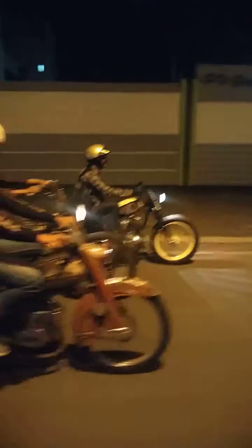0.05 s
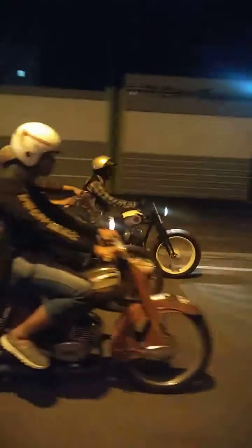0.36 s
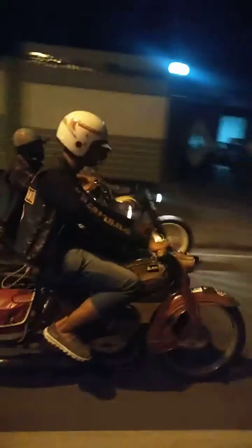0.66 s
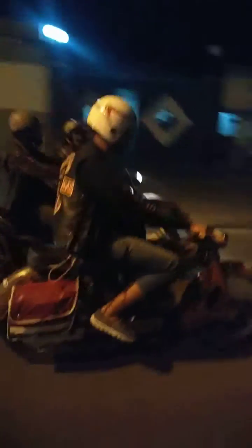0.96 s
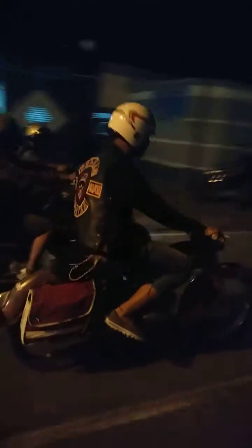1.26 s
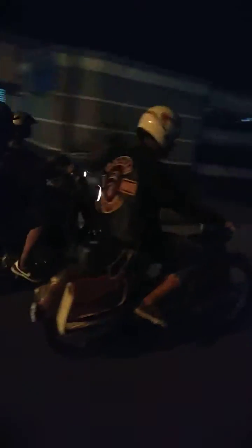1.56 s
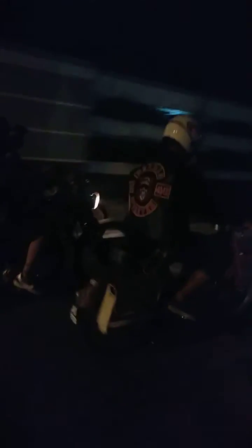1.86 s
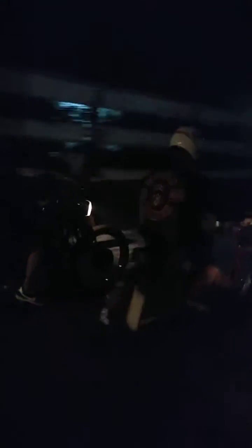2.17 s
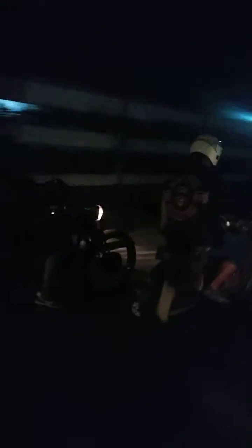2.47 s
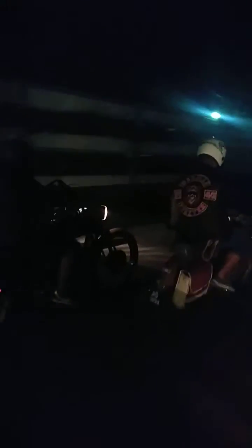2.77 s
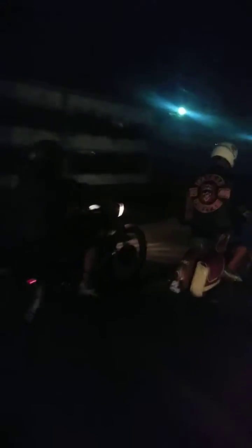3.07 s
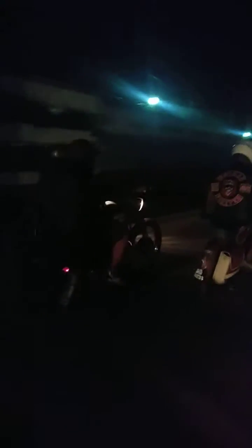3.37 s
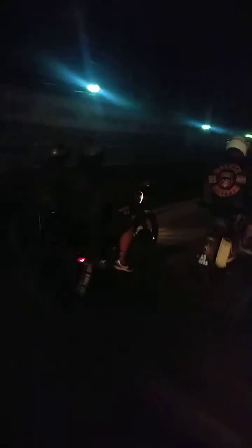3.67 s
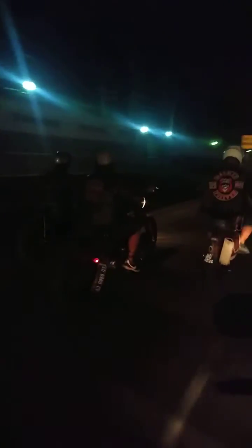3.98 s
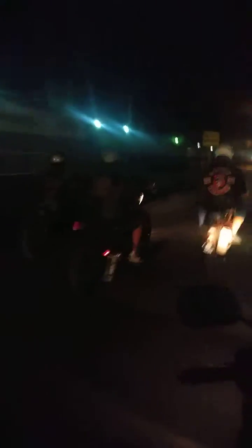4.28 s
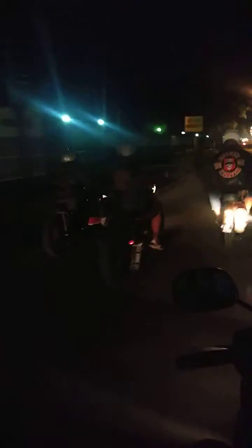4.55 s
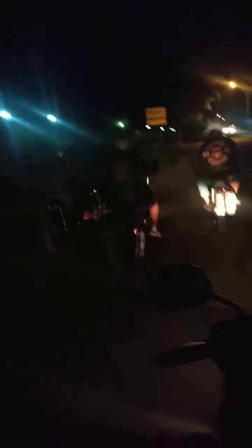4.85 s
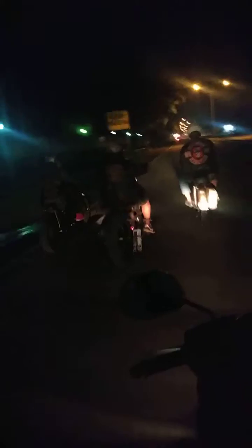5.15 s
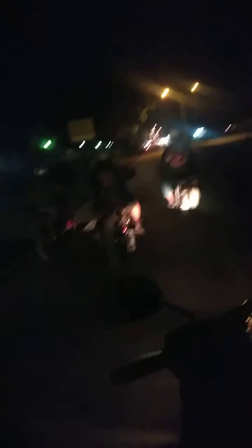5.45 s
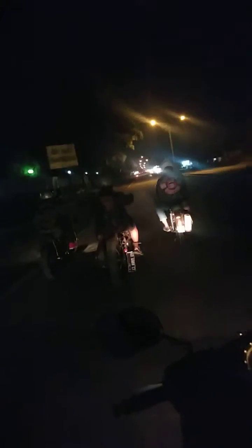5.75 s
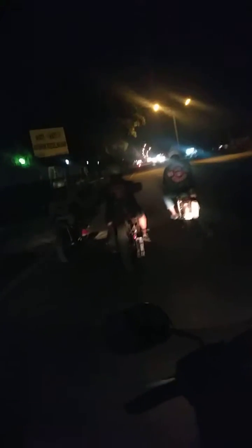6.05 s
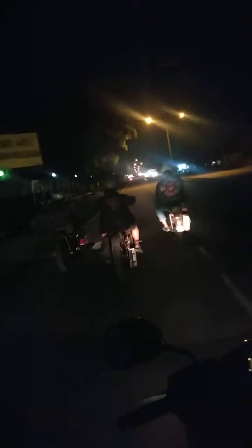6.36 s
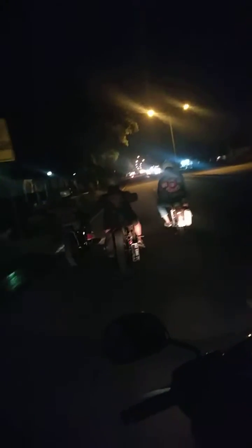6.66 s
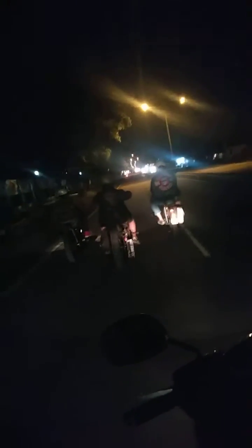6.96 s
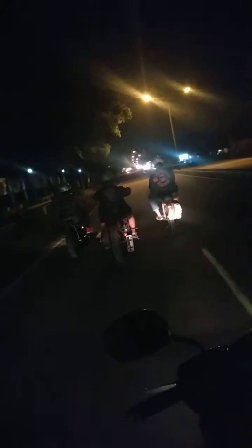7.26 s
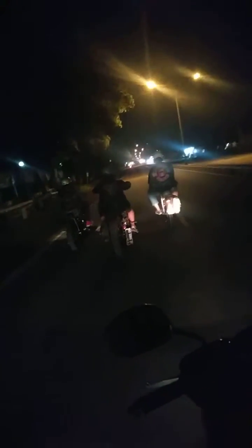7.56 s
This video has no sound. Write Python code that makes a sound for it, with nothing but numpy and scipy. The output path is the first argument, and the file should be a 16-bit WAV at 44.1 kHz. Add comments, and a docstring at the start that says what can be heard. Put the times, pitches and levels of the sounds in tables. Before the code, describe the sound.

Several motorcycles ride together along a road, the microphone travelling among them. Two nearby engines chug slowly, their beats drifting past each other over deeper engines, a gear whirr, clatter and tyre hiss. Hollow knocks, a few muffled exhaust pops and metal clacks come through. Then the group speeds up with hard exhaust spits, louder barks and gusts of wind on the microphone.

```python
"""Riding in a group of motorcycles at night, heard from one of them.
Two slow twins thump and spit at nearly the same speed, so their beats slide past each other. Engines
boom behind, a small bike's gears whirr, chains sing and tyres hiss, with scattered hollow knocks.
Near 3 s a silencer pops and loose metal clacks. From about 4.4 s the group gathers speed: hard spits
crack out, wind buffets the microphone more strongly and the exhausts bark, ringing twice near 7.1 s."""
import sys
import numpy as np
from scipy import signal
from scipy.fft import rfft, irfft
from scipy.io import wavfile

SR = 44100
rng = np.random.default_rng(int(sys.argv[2]) if len(sys.argv) > 2 else 0)


def master(y):
    """Save y as 16-bit WAV."""
    cut = np.clip(np.atleast_2d(y).T, -1, 1)
    pcm = np.round(cut * 32767)  # scale
    wavfile.write(sys.argv[1], SR, pcm.astype(np.int16))


N = 336024
TIME = np.arange(N) / SR

# closest twin's spit spectrum: freq_hz, gain_db
NEAR_SPIT_SPECTRUM = [(800, -24), (2600, -13), (4000, -2), (6500, 4.5), (8500, -1.5), (12000, -4),
                      (13200, -5.5), (14200, -22), (15500, -30)]
# low buffeting spectrum: freq_hz, gain_db
BUFFET_SPECTRUM = [(20, -44), (60, -18), (150, 1.5), (350, 8), (600, 1), (900, -7.5), (1400, -18.5),
                   (2200, -34), (4000, -80), (15000, -89)]


def gain_of(db):
    return 10 ** (np.asarray(db) / 20)


def unit_rms(x):
    return x / np.sqrt(np.mean(x ** 2) + 1e-20)


def curves(rows):
    """Each column after time_s, interpolated per sample."""
    time_s, *columns = np.transpose(rows)
    return [np.interp(TIME, time_s, column) for column in columns]


def add(mix, start_s, sound):
    part = mix[max(round(start_s * SR), 0):][:len(sound)]
    part += sound[:len(part)]


def coloured(x, spectrum):
    """Minimum-phase filter of unit energy with the given spectrum."""
    freq_hz, gain_db = np.transpose(spectrum)
    bins_hz = abs(np.fft.fftfreq(8192, 1 / SR))
    log_gain = np.log(gain_of(np.interp(np.log(bins_hz + 1), np.log(freq_hz), gain_db)))
    response = np.exp(np.conj(signal.hilbert(log_gain)))
    taps = np.fft.ifft(response).real[:len(bins_hz) // 2]
    return signal.oaconvolve(x, taps / np.linalg.norm(taps))[:N]


def wander(cutoff_hz):
    """Low-passed noise, unit RMS."""
    lowpass = np.exp(-(np.fft.rfftfreq(N, 1 / SR) / cutoff_hz) ** 2)
    return unit_rms(irfft(rfft(rng.standard_normal(N)) * lowpass, N))


def swell(rise_s):
    """Quick rise to 1, slower fall."""
    rises = np.arange(int(9 * rise_s * SR) + 2) / (rise_s * SR)
    return rises * np.exp(1 - rises)


def ring(pitch_hz, rise_s):
    """Sine under a swell."""
    envelope = swell(rise_s)
    return envelope * np.sin(2 * np.pi * pitch_hz * np.arange(len(envelope)) / SR)


def resonate(x, pitch_hz, width_hz):
    """Resonance that follows a pitch curve."""
    carrier = np.exp(2j * np.pi * np.cumsum(pitch_hz) / SR)
    pole = np.exp(-np.pi * width_hz / SR)
    return (carrier * signal.lfilter([(1 - pole) ** 2], [1, -2 * pole, pole ** 2], x / carrier)).real


def firings(cycles, uneven_db):
    """One click of uneven size per whole cycle."""
    at = np.nonzero(np.diff(np.floor(cycles)) > 0)[0]
    clicks = np.zeros(N)
    clicks[at] = gain_of(uneven_db * np.clip(rng.standard_normal(N)[:len(at)], -2, 2))
    return clicks


def puffs(clicks, rise_s):
    """One short noise burst per click."""
    return signal.oaconvolve(clicks, swell(rise_s))[:N] * rng.standard_normal(N)


def bursts(events, spectrum, rise_s, trim_db):
    """One filtered noise burst per event."""
    envelope = np.zeros(N)
    for start_s, level_db in events:
        add(envelope, start_s, gain_of(level_db + trim_db) * swell(rise_s))
    return coloured(envelope * rng.standard_normal(N), spectrum)


def crank(speed, start_cycles, jitter_cycles=.003):
    """Running count of engine cycles, slightly uneven as in slow running."""
    return start_cycles + np.cumsum(curves(speed)[0]) / SR + jitter_cycles * wander(4.4)


def throttle(exhaust, twists, open_s=0.086, close_s=0.21, thump_share=0.057):
    """Each twist opens, holds and closes, lifting the spit and, slightly, the thump."""
    lift_db = np.zeros(N)
    for start_s, hold_s, twist_db in twists:
        opening = 1 + (TIME - start_s) / open_s
        closing = 1 - (TIME - start_s - hold_s) / close_s
        lift_db += twist_db * np.clip(np.minimum(opening, closing), 0, 1)
    thump_db, spit_db, rear_db, lope_db = curves(exhaust)
    return thump_db + thump_share * lift_db, spit_db + lift_db, rear_db, lope_db


def thump(cycles, strokes, thump_db, uneven_db):
    """Each gas stroke rings the pipe and silencer for a few swings."""
    out = np.zeros(N)
    for phase_cycles, pitch_hz, width_hz, level_db in strokes:
        pipe = ring(pitch_hz, rise_s=1 / (np.pi * width_hz))
        clicks = firings(cycles - phase_cycles, uneven_db)
        out += gain_of(level_db) * signal.oaconvolve(clicks, pipe)[:N]
    return out * gain_of(thump_db)


def spit(cycles, spit_db, spectrum, valves_cycles, rear_db, lope_db, rise_s, uneven_db=1.9, tints=4):
    """Two exhaust valves release gas at unequal gaps; the rear lopes, strong and weak by turns."""
    front_cycles, rear_cycles = (cycles - phase for phase in valves_cycles)
    front = firings(front_cycles, uneven_db)
    rear = firings(rear_cycles, uneven_db) * gain_of(rear_db - lope_db * np.cos(np.pi * rear_cycles))
    clicks = (front + rear) * gain_of(spit_db)
    # each half cycle takes one of a few random tints of the spectrum
    freq_hz, gain_db = np.transpose(spectrum)
    tints_db = 2.5 * rng.standard_normal((tints, len(freq_hz)))
    tints_db -= tints_db.mean(0)
    chosen = rng.integers(0, tints, N)[np.floor(2 * front_cycles).astype(int)]
    gas = puffs(clicks, rise_s) + 0.12 * puffs(clicks, rise_s=0.0065)
    return sum(coloured(gas * (chosen == k), np.transpose([freq_hz, gain_db + tint_db]))
               for k, tint_db in enumerate(tints_db))


def near_twin(valves_cycles=(.968, .382)):
    """The closest twin's exhaust thumps, barks and spits, slowly gaining speed."""
    # engine speed: time_s, cycle_hz
    speed = [(0.0, 13.416), (0.84, 13.748), (1.31, 13.757), (1.98, 14.154), (2.88, 14.139), (4.6, 14.02),
             (5.07, 14.3), (6.53, 14.564), (7.01, 14.451), (7.62, 14.7)]
    # steady exhaust: time_s, thump_db, spit_db, rear_vs_front_db, lope_db
    exhaust = [(0, 0, -42, -4, 2), (1.05, .5, -56, -8, 4), (1.5, 0.5, -34.5, -0.5, -3),
               (2.6, 0.6, -43.5, -4, 3), (3.4, -2, -37, -10, 7), (4.15, -0.5, -34, -5, -4),
               (4.45, -5, -33.5, -2, 7.5), (4.85, -2, -32.5, -1.5, -2), (5.3, -3.5, -34.5, -3.5, 2),
               (5.6, -7.5, -33.5, -8, -2), (6.15, -6, -37, -6.5, -6), (6.9, -3, -36, -3, -1),
               (7.62, -12, -36, -7, 2.5)]
    # throttle twists: start_s, hold_s, twist_db
    twists = [(4.68, 0.39, 3), (7.24, 0.14, 3)]
    # pipe notes of the gas strokes: phase_cycles, pitch_hz, width_hz, level_db
    strokes = [(-.017, 110.5, 25, -12.9), (-.017, 345, 35, -33), (.218, 155.3, 94.8, -9.4),
               (.323, 142.1, 46.2, -10.4), (.616, 215.2, 87.1, -8.6)]
    cycles = crank(speed, start_cycles=-.491)
    thump_db, spit_db, rear_db, lope_db = throttle(exhaust, twists)
    return (thump(cycles, strokes, thump_db, uneven_db=0) + load_bark(cycles, valves_cycles)
            + spit(cycles, spit_db, NEAR_SPIT_SPECTRUM, valves_cycles, rear_db, lope_db, rise_s=0.001))


def second_twin(valves_cycles=(.977, .45)):
    """The twin alongside thumps and spits, mostly a little slower."""
    # engine speed: time_s, cycle_hz
    speed = [(0.0, 13.586), (0.48, 13.905), (2.03, 13.354), (3.59, 13.961), (4.8, 13.778), (5.4, 13.791),
             (6.79, 14.33), (7.62, 14.439)]
    # steady exhaust: time_s, thump_db, spit_db, rear_vs_front_db, lope_db
    exhaust = [(0, -5.5, -46, -3, 1.2), (1.2, 0, -48, -5, 1), (1.95, 1, -49, -6, 1.2),
               (2.2, 0, -32, -2, 0.81), (3.9, 5, -37, -6, 2.9), (4.5, 5, -38, -6, 4),
               (5.05, 3, -38, -1, 1.47), (5.35, 6.5, -32, 3, 1.1), (5.52, 1, -39, -2, 1.46),
               (5.9, -2, -43.5, 5.5, 1), (6.2, 3, -36, 3, 1), (6.85, 0, -44.5, 4, 0.57),
               (7.62, 0, -41, -0.5, 1.026)]
    # throttle twists: start_s, hold_s, twist_db
    twists = [(2.85, 1.2, 5.4), (4.68, 0.17, 4.3)]
    # low and high pipe notes: phase_cycles, pitch_hz, width_hz, level_db
    strokes = [(-0.073, 207, 49, -19.6), (0.041, 87, 25, -31), (0.485, 234, 25, -31.1),
               (0.442, 76, 25, -29)]
    overtones = [(0.99, 352, 17, -40.5), (.45, 440, 17, -42.5)]
    # spit spectrum: freq_hz, gain_db
    spectrum = [(400, -8), (820, -5), (1200, -18), (2000, 5.5), (2700, -7.5), (4000, 2), (5200, 5.5),
                (5700, 2.5), (6500, 8), (8500, -4), (12000, -11), (13500, -13), (15500, -29)]
    cycles = crank(speed, start_cycles=-.699)
    thump_db, spit_db, rear_db, lope_db = throttle(exhaust, twists)
    return (thump(cycles, strokes + overtones, thump_db, uneven_db=1.5)
            + spit(cycles, spit_db, spectrum, valves_cycles, rear_db, lope_db, rise_s=0.0011))


def pack(jitter=.03, roughness=0.26, boom_trim_db=5.5, bark_trim_db=-1):
    """Three engines behind: each firing booms in the silencer and, under throttle, barks."""
    # exhaust levels: time_s, boom_db, bark_db
    levels = [(0, -28.5, -42), (1.0, -29, -44), (1.8, -26, -49), (3.4, -24, -47), (4.42, -28, -36),
              (4.53, -25, -29.5), (5.3, -24, -34.5), (6.3, -25.5, -34.5), (7.62, -24.5, -31.5)]
    # firing rates: time_s, first_hz, second_hz, third_hz
    rates = [(0, 14.2, 27.7, 17.9), (2, 14.36, 27.4, 20.4), (4, 13.7, 29, 21.8), (5, 18.5, 28.3, 23.5),
             (6, 20, 30, 24), (7.62, 22.7, 33.3, 26.1)]
    # exhaust spectra: freq_hz, gain_db
    boom_spectrum = [(25, -24), (50, -18.5), (70, -7.5), (90, -4.5), (118, -1), (140, -5), (168, -5.5),
                     (198, -1), (250, -6.5), (340, -13), (500, -38), (900, -51.5), (4000, -85.5)]
    bark_spectrum = [(150, -10.5), (300, -7.5), (430, 3.5), (560, -6), (750, -5), (1000, -15.5),
                     (1500, -22.5), (2500, -38), (5000, -86), (15000, -83)]
    clicks = np.zeros(N)
    for rate_hz in curves(rates):
        cycles = np.cumsum(rate_hz * (1 + jitter * wander(5))) / SR
        clicks += firings(cycles, uneven_db=1.6)
    gas = unit_rms(puffs(clicks, rise_s=0.0072))
    boom = unit_rms(coloured(unit_rms(clicks) + roughness * gas, boom_spectrum))
    bark = unit_rms(coloured(gas, bark_spectrum))
    boom_db, bark_db = curves(levels)
    return gain_of(boom_db + boom_trim_db) * boom + gain_of(bark_db + bark_trim_db) * bark


def gear_whirr(jitter=.007, trim_db=-2.5):
    """The small bike's gear teeth clash once per shaft turn and ring the casing."""
    # shaft speed: time_s, turn_hz
    shaft = [(0, 91), (.7, 90.5), (1.3, 89.5), (2.3, 86), (4.2, 86), (7.62, 91)]
    # casing resonances: pitch_hz, width_hz, gain_db
    modes = [(1640, 110, -7.5), (1828, 100, 0.5), (1983, 73, 1.5), (3820, 430, -15.5)]
    # whirr level: time_s, level_db
    levels = [(0, -41.5), (.45, -40), (.75, -39), (.94, -37.5), (1.14, -38.5), (1.45, -44.5), (2.0, -46),
              (2.6, -43), (3.0, -45), (3.2, -56), (3.95, -43), (4.3, -52), (5.6, -62), (7.62, -52)]
    turns = np.cumsum(curves(shaft)[0] * (1 + jitter * wander(4))) / SR
    clicks = firings(turns, uneven_db=1.1)
    drive = unit_rms(clicks) + .5 * unit_rms(puffs(clicks, rise_s=.0005)) + .2 * rng.standard_normal(N)
    bins_hz = np.fft.rfftfreq(N, 1 / SR)
    casing = sum((-1) ** k * gain_of(gain_db) / (1 + 1j * (bins_hz - pitch_hz) / width_hz) ** 2
                 for k, (pitch_hz, width_hz, gain_db) in enumerate(modes))
    return gain_of(curves(levels)[0] + trim_db) * unit_rms(irfft(rfft(drive) * casing, N))


def singing_metal(flutter_db=3):
    """Chains and metal parts sing as bikes slip past: tones swell and fade, most drifting in pitch. One very
    brief tone near 3.9 s is a sharp metal clack."""
    # metal tones, and a short clack at 3.935 s: peak_s, sigma_s, pitch_hz, width_hz, drift_hz_per_s, level_db
    tones = [(0.042, 0.28, 1895, 36.7, -120, -45.5), (0.125, 0.28, 3040, 260, -200, -52),
             (0.1, 0.2, 3890, 170, -250, -50.5), (0.12, .26, 6680, 303, -300, -53),
             (0.6, 0.42, 2870, 130, -76, -52), (0.655, 0.24, 3750, 218, -220, -49.5),
             (0.667, 0.25, 6020, 260, -200, -50), (1.025, .18, 4280, 40, -59, -57),
             (0.722, 0.15, 1975, 24, 130, -44), (0.76, 0.061, 1793, 22, 0, -42),
             (1.484, 0.16, 2022, 35, 48, -47.5), (3.4, 0.56, 1899, 40, -14, -46),
             (3.4, 1, 776, 60, 0, -45.5), (3.6, 0.68, 886, 70, 0, -48.5), (6.3, 0.99, 5220, 140, 0, -59.5),
             (3.935, 0.013, 1830, 120, 0, -32)]
    rub = rng.standard_normal(N) * gain_of(flutter_db * wander(88))
    out = np.zeros(N)
    for peak_s, sigma_s, pitch_hz, width_hz, drift_hz_per_s, level_db in tones:
        span = abs(TIME - peak_s) < 3 * sigma_s
        offset_s = TIME[span] - peak_s
        tone = unit_rms(resonate(rub[span], pitch_hz + drift_hz_per_s * offset_s, width_hz))
        out[span] += gain_of(level_db) * np.exp(-(offset_s / sigma_s) ** 2 / 2) * tone
    return out


def machinery(clatter_trim_db=4, flutter_db=2):
    """Countless small impacts of valve gear, chains and tyres merge into clatter and hiss."""
    # machinery levels: time_s, clatter_db, hiss_db
    levels = [(0, -40.5, -40.5), (.85, -42, -43), (2.3, -43, -39.5), (3.9, -41.5, -41),
              (4.25, -44.5, -43.5), (4.7, -41, -44.5), (5.25, -42.5, -46), (5.65, -46.5, -49.5),
              (6.15, -46.5, -48), (6.5, -43, -44.5), (7.0, -48, -51.5), (7.62, -45, -48.5)]
    # impact spectra: freq_hz, gain_db
    clatter_spectrum = [(300, 8), (420, 3), (535, -7.5), (640, 4), (780, 4), (1050, -4), (1400, -3),
                        (1750, -0.5), (2200, -1.5), (2600, -14), (3500, -31), (6000, -43)]
    hiss_spectrum = [(1500, 5), (2650, -3.5), (3100, 3), (3900, 4.5), (4500, 1.5), (5200, 3), (5700, 4),
                     (6500, 5.5), (7300, -1), (9500, -7), (12500, -9), (14000, -22), (15500, -43)]
    clatter = coloured(rng.standard_normal(N) * gain_of(flutter_db * wander(52)), clatter_spectrum)
    hiss = coloured(rng.standard_normal(N) * gain_of(flutter_db * wander(54)), hiss_spectrum)
    clatter_db, hiss_db = curves(levels)
    return gain_of(clatter_db + clatter_trim_db) * unit_rms(clatter) + gain_of(hiss_db) * unit_rms(hiss)


def wind(lump_db=1.65, sway_db=1.0):
    """Eddies strike the microphone in lumps, over a slower sway."""
    # wind level: time_s, level_db
    levels = [(0, -38.5), (2, -41.5), (4.35, -36.5), (4.65, -32), (5.2, -27), (5.36, -33.5), (5.46, -26),
              (5.66, -29), (5.78, -24), (5.92, -31), (6.19, -22), (6.31, -31), (6.6, -24.5), (7.03, -26.5),
              (7.11, -30), (7.17, -34), (7.29, -21), (7.4, -25), (7.62, -25)]
    eddies = rng.standard_normal(N) * gain_of(lump_db * wander(57) + sway_db * wander(5.9))
    return gain_of(curves(levels)[0]) * unit_rms(coloured(eddies, BUFFET_SPECTRUM))


def knocks_and_ringing_barks():
    """Hollow knocks and, near 7.1 s, two ringing exhaust barks, all on one set of decaying modes."""
    # knocks and barks: start_s, level_db, tilt_db_per_octave
    events = [(.177, -22.5, -8), (0.3492, -16.5, 0.5), (1.252, -29, -1), (1.645, -19.5, -0.5),
              (1.659, -27, 0), (1.805, -31, 8.5), (1.958, -25.5, -3), (2.066, -26, 3.5), (2.654, -30, 2),
              (6.026, -15.5, 1), (7.06, -21, 3), (7.136, -19, 3)]
    # hollow resonances: pitch_hz, mode_db, t60_s
    modes = [(456, 3, 0.026), (559, -4, 0.071), (727, -1.5, 0.034), (930, -12.5, 0.045), (1046, -7, 0.023),
             (1215, -19.5, 0.055), (1544, -21.5, 0.03)]
    age_s = np.arange(SR // 5) / SR
    out = np.zeros(N)
    for start_s, level_db, tilt_db_per_octave in events:
        for k, (pitch_hz, mode_db, t60_s) in enumerate(modes):
            tilt_db = tilt_db_per_octave * np.log2(pitch_hz / modes[0][0])
            envelope = gain_of(level_db + mode_db + tilt_db - 60 * age_s / t60_s)
            add(out, start_s, (-1) ** k * envelope * np.sin(2 * np.pi * pitch_hz * age_s))
    return out


def wind_slaps_and_barks(tail_db=-7, tail_stretch=2.4):
    """Wind slaps and short exhaust barks: each a noise burst with a longer, deeper tail."""
    # slaps, and barks at 6.08 s and after 7 s: start_s, level_db, length_s
    events = [(0.485, -27.5, 0.024), (4.525, -26, 0.025), (5.427, -23.5, 0.02), (5.719, -24, 0.0069),
              (5.769, -29.5, 0.028), (6.081, -22, 0.005), (6.153, -26.5, 0.023), (6.367, -19.5, 0.026),
              (6.392, -22, 0.016), (6.957, -23, 0.011), (7.065, -22.5, 0.0054), (7.131, -24.5, 0.0067),
              (7.235, -27, 0.0036), (7.309, -23, 0.011)]
    # attack spectrum: freq_hz, gain_db
    attack_spectrum = [(150, -24), (350, 16.5), (530, 5.5), (770, 6.5), (1100, 1.5), (1600, -8.5),
                       (2400, -17), (5000, -53)]
    attack, tail = np.zeros((2, N))
    for start_s, level_db, length_s in events:
        add(attack, start_s, gain_of(level_db) * swell(length_s / 3))
        add(tail, start_s, gain_of(level_db + tail_db) * swell(tail_stretch * length_s / 3))
    return (coloured(attack * rng.standard_normal(N), attack_spectrum)
            + coloured(tail * rng.standard_normal(N), BUFFET_SPECTRUM))


def pops():
    """Unburnt fuel goes off in a silencer further back and rings it briefly."""
    # muffled pops: start_s, pitch_hz, level_db
    events = [(2.843, 740, -33), (2.984, 700, -25), (3.058, 720, -27), (3.14, 830, -24.5),
              (3.274, 825, -30), (3.415, 890, -29)]
    out = np.zeros(N)
    for start_s, pitch_hz, level_db in events:
        add(out, start_s, gain_of(level_db) * ring(pitch_hz, rise_s=0.0017))
    return out


def clacks():
    """Loose metal on nearby bikes strikes and dies at once."""
    # strikes: start_s, level_db
    strikes = [(3.093, -27), (3.1309, -40), (3.2401, -29), (4.793, -25), (5.114, -32)]
    # clack spectrum: freq_hz, gain_db
    spectrum = [(900, -11), (1600, -4), (2200, -1), (3200, 20), (4500, -1), (7000, -25), (14000, -49)]
    return bursts(strikes, spectrum, rise_s=0.0024, trim_db=-8)


def load_bark(cycles, valves_cycles, rear_db=-6, trim_db=-2):
    """Under load each firing of the closest twin barks, the front cylinder most."""
    # bark level: time_s, level_db
    levels = [(0, -45), (3.6, -34), (4.35, -23.5), (4.55, -22), (5.05, -21), (5.35, -24), (5.6, -22),
              (6.1, -25.5), (6.8, -22.5), (7.62, -21)]
    # bark spectrum: freq_hz, gain_db
    spectrum = [(150, -21), (300, 7), (450, 5.5), (600, 4.5), (800, -2), (1100, -9), (1600, -19.5),
                (2300, -16), (3200, -37.5), (8000, -57)]
    front, rear = (firings(cycles - phase, uneven_db=2) for phase in valves_cycles)
    gas = puffs(front + gain_of(rear_db) * rear, rise_s=0.0016)
    return gain_of(curves(levels)[0] + trim_db) * coloured(gas, spectrum)


def hard_spits():
    """Now and then a fuller charge cracks out of the pipe."""
    # charges: start_s, level_db
    charges = [(4.4772, -21), (4.535, -23.5), (4.571, -34), (4.62, -20), (4.691, -23), (4.7905, -21),
               (4.8327, -18.5), (4.862, -22), (4.9035, -31), (5.0437, -22), (5.1845, -26), (5.8738, -23.5),
               (5.9465, -21.5), (6.0865, -24), (6.123, -26), (6.157, -24), (6.431, -28), (6.459, -21.5),
               (6.498, -23), (6.513, -29), (6.568, -24), (6.584, -23), (7.3951, -29), (7.488, -26)]
    return bursts(charges, NEAR_SPIT_SPECTRUM, rise_s=0.0014, trim_db=-9)


def scene():
    """Two twins close by, in the noise of the group; mono."""
    exhausts = near_twin() + second_twin() + hard_spits() + pops() + pack()
    moving_parts = gear_whirr() + singing_metal() + machinery()
    return (exhausts + moving_parts + wind() + wind_slaps_and_barks()
            + knocks_and_ringing_barks() + clacks())[None]


def record(dry, highpass_hz=8, ceiling=0.49, lowpass_hz=15700):
    """The deepest rumble is removed, peaks are rounded off and the band is limited."""
    highpassed = signal.lfilter(*signal.butter(1, highpass_hz, "high", fs=SR), dry)
    rounded = highpassed / (1 + (highpassed / ceiling) ** 6) ** (1 / 6)
    taps = signal.firwin(511, lowpass_hz, window=("kaiser", 9), fs=SR)
    return signal.oaconvolve(rounded, taps[None], "same")


dry = scene()
out = record(dry)
master(out)
```